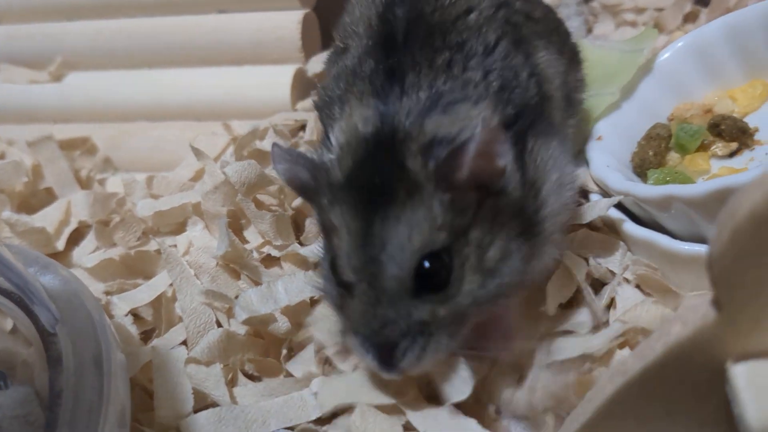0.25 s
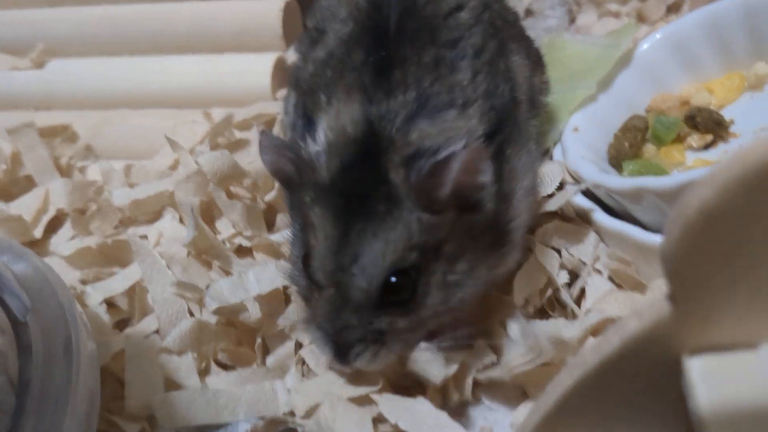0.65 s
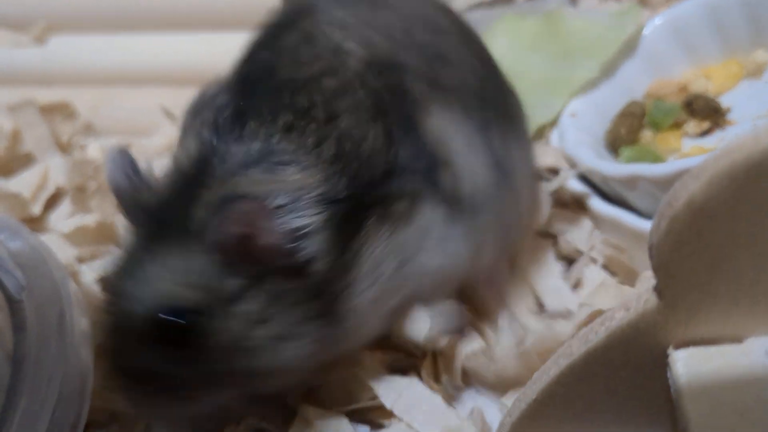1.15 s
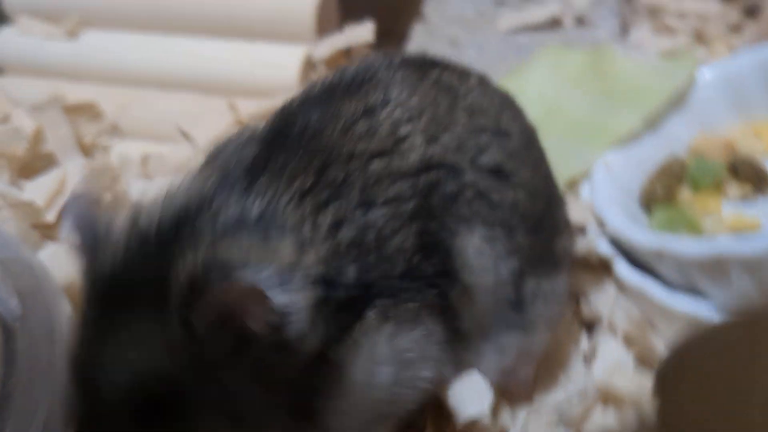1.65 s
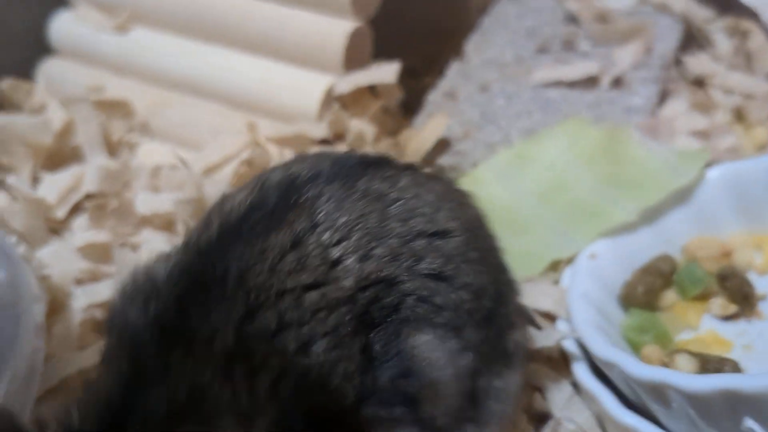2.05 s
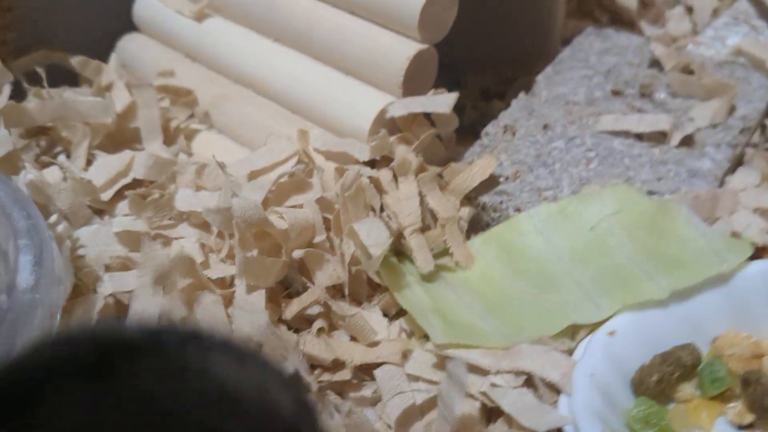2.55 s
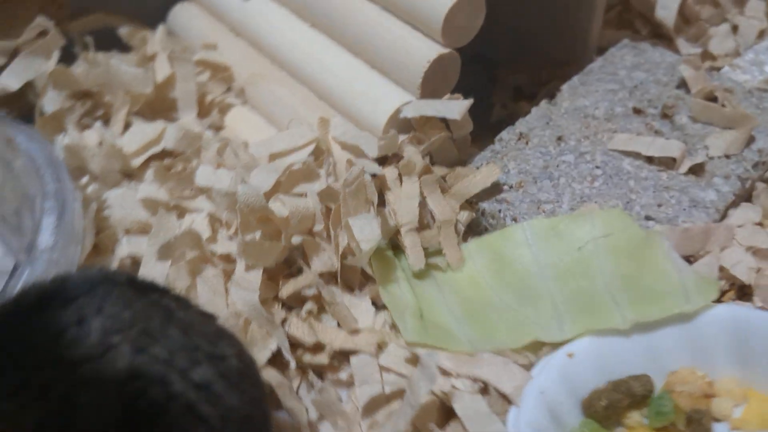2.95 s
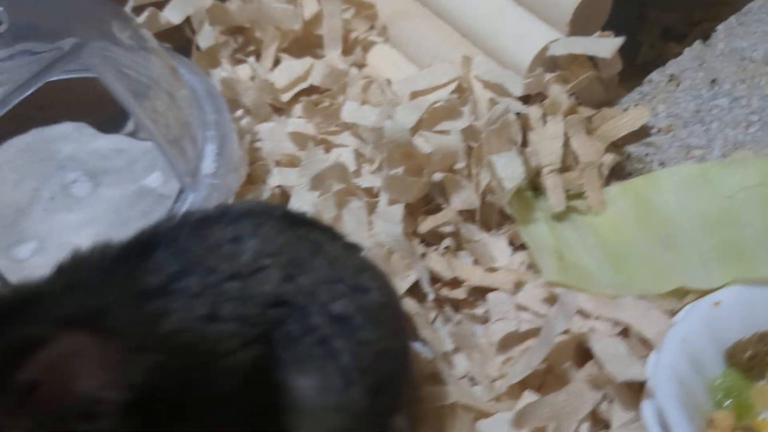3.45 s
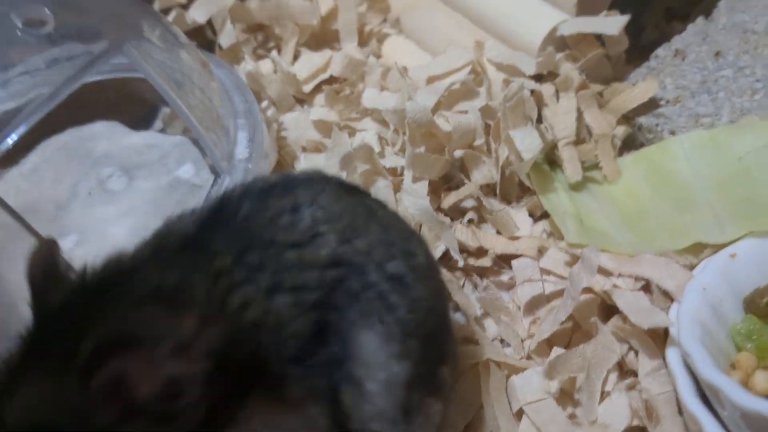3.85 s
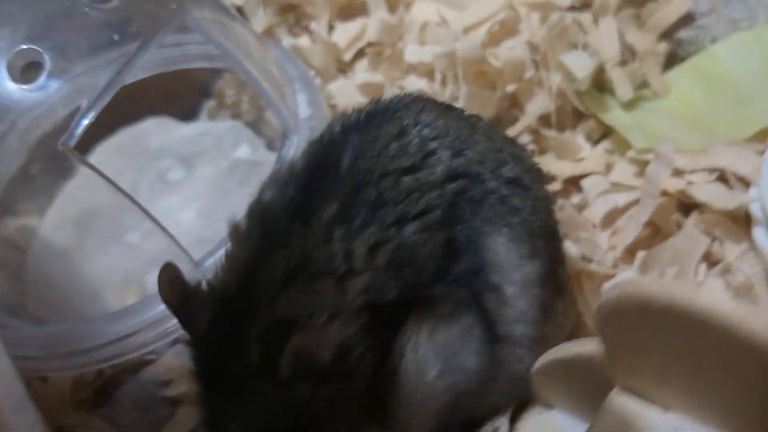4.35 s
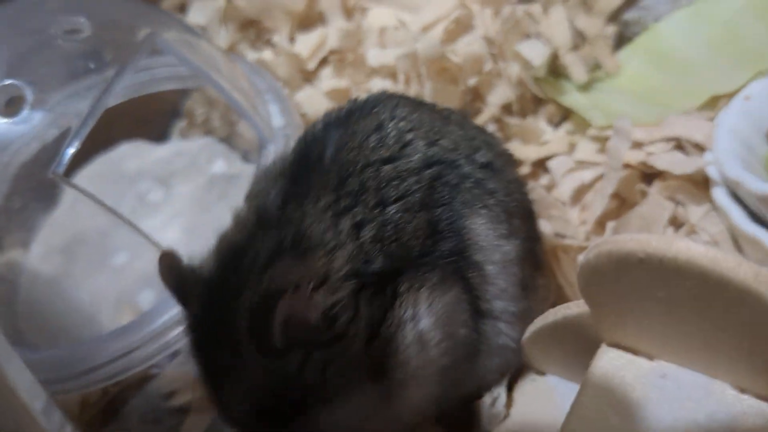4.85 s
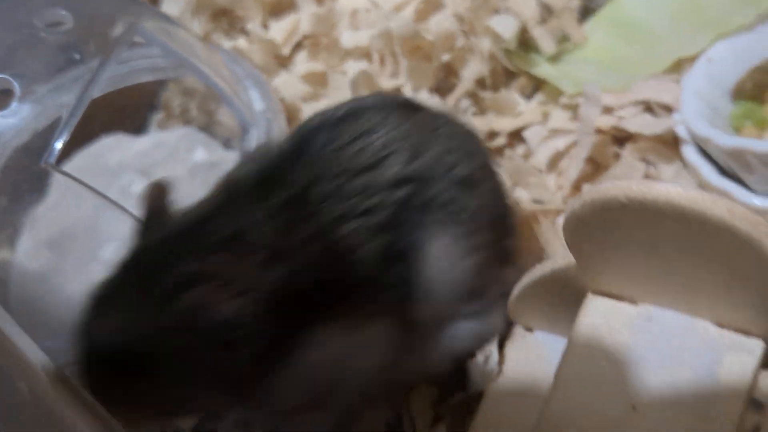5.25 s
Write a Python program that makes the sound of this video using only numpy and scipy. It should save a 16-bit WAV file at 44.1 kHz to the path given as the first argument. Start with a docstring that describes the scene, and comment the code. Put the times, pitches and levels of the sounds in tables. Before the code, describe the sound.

A hamster rustles crisply through wood shavings, then bumps and scrapes a plastic tub, while a deep unsteady hum sinks away.

```python
"""In a cage, a dwarf hamster noses through dry wood shavings, close to a hand-held phone.
Filtered grain noise makes the crackle, and short noise bursts the snaps and crunches of the shavings.
The animal also bumps a plastic sand bath: decaying modes clatter and knock, and friction noise scrapes.
Now and then the cage floor gives a hollow tap, from modes and a low thud.
Underneath lies a low, throbbing hum of drone, rumble and mains tones; it sinks towards the end."""
import sys
import numpy as np
from scipy import signal
from scipy.fft import rfft, irfft, next_fast_len
from scipy.io import wavfile
from scipy.ndimage import uniform_filter1d

SR = 44100
rng = np.random.default_rng(int(sys.argv[2]) if len(sys.argv) > 2 else 0)


def generate_wav(signal):
    """Clip the signal to [-1, 1] and save it as 16-bit WAV at the path in sys.argv[1]."""
    frames = np.transpose(np.atleast_2d(signal))
    scaled = np.clip(frames, -1, 1) * 32767
    pcm = np.round(scaled).astype(np.int16)
    wavfile.write(sys.argv[1], SR, pcm)


N = 243252
T = np.arange(N) / SR  # s

# In all tables level_db is relative within the layer, and pan_db is left minus right.
# gain of the whole hum, nearly steady and then sinking: time_s, gain_db
HUM_LEVEL = [(0, -0.5), (.5, 2), (1.6, 0), (2.5, -0.5), (3.4, -2.5), (4.1, -1.5), (4.6, -11), (5.1, -13),
             (5.52, -23)]
# strongest surges of the drone: crest_s, length_s, lift_db
SURGES = [(0.617, 0.078, 4), (0.765, 0.057, 6), (1.474, 0.052, 6), (1.866, 0.057, 9), (2.37, 0.21, 5.5),
          (2.667, 0.13, 8), (2.841, 0.083, 12), (3.199, 0.075, 13.5), (3.682, 0.24, 5), (5.205, 0.027, 6.5),
          (5.407, 0.037, 16)]
# mains tones in the hum: pitch_hz, level_db
MAINS_TONES = [(200, -70), (300, -74)]
# outline of the rumble: freq_hz, density_db (per Hz)
RUMBLE_COLOUR = [(20, -34.5), (35, -8.5), (50, 0.5), (70, -6.5), (88, 0.5), (105, -4), (125, 5.5),
                 (160, -10), (230, -14), (320, -23.5), (420, -29), (700, -34.5), (1300, -47.5),
                 (3000, -65.5)]

# three tables of blows: on the bath's loose lid; paws knocking on its wall;
# the cage floor flexing under a step, mostly before the clatter. Columns:
# start_s, level_db, thud_db (beside the ring), brightness_db (per octave), contact_s (onset softness), pan_db
LID_CLATTER = [(4.042, -38.5, -17, 4.5, 0.0014, -5), (4.047, -31.5, 6.5, -4.5, 0.0026, -11.5),
               (4.061, -38, -12, 0, 0.013, -11), (4.0755, -30.5, -3, 3.5, 0.019, -3),
               (4.087, -42, -13, 0, 0.018, -24), (4.108, -33, -6, -1.5, 0.0044, -4.5)]
WALL_KNOCKS = [(4.244, -39, -10, 2.5, 0.0018, -8.5), (4.248, -30, -29, -5, 0.002, -2.5),
               (4.271, -45.5, 10.5, -7, .004, -5), (4.29, -52, 16, -17, 0.014, -1),
               (4.301, -46, 7, -4, 0.011, -8), (4.3205, -45, 4, -1, 0.0019, -4),
               (4.368, -57.5, -14, -23, 0.024, -9), (4.419, -44, -19, 1.5, 0.027, -6),
               (4.436, -33.5, -19, -1.5, 0.0045, 0.5), (4.441, -35, -36, 2, 0.0071, -12),
               (4.5845, -52.5, -28, -2, .003, -2.5), (4.681, -34.5, -15, -1.5, 0.011, -5),
               (4.686, -32.5, -15, -0.5, 0.012, -8), (4.692, -31, -23, 1, 0.013, -4)]
FLOOR_TAPS = [(1.934, -50, 14, 3, 0.012, -22), (2.490, -43.5, 9.5, 3.5, 0.014, -18),
              (2.67, -60, -15, -3, 0.012, -20), (5.091, -36.5, -4, 6.5, 0.033, -17)]
# modes that each part rings with: pitch_hz, level_db, t60_s
LID_MODES = [(224.6, -11, 0.23), (315, -2.5, 0.071), (379, 4, 0.053), (440, -9.5, 0.14), (600, -2, 0.033),
             (670, -6, 0.038), (860, -2, 0.032), (1003, -4.5, 0.067), (1174, -2.5, 0.072),
             (1430, -8, 0.034), (1470, -5, 0.082), (1653, -5, 0.089), (1815, 0.5, 0.066),
             (2200, -17, 0.023), (2620, -6, 0.077), (2970, -7, 0.055), (3373, -2.5, 0.068),
             (4500, -9, 0.042), (5010, -9.5, 0.048), (5250, -12, 0.048), (6580, -18, 0.089)]
WALL_MODES = [(339.3, -5, 0.076), (395.3, -2, 0.097), (448, 2.5, 0.046), (583, -0.5, 0.043),
              (644, -2, 0.054), (714, -3.5, 0.026), (797, -6, 0.024), (1020, -17, 0.03), (1160, -15, 0.036),
              (1643, -10.5, 0.048), (1810, -10.5, 0.054), (2535, -19.5, 0.086), (2935, -11, 0.075),
              (4000, -19.5, 0.068)]
FLOOR_MODES = [(456.3, 19, 0.082), (415, -2, .04), (680, -4, 0.021), (1550, -12.5, 0.044),
               (1760, -23, 0.046), (2350, -26, 0.082), (6020, -26, 0.025)]
# outline of the scuff at the contact: freq_hz, density_db (per Hz)
CONTACT_COLOUR = [(200, 5.5), (700, -6), (1200, -12.5), (3000, -18.5), (6000, -19.5), (11000, -29),
                  (16000, -35)]

# fur and claws scraping along the bath:
# start_s, length_s, level_db, swell_db (change over the scrape), pan_db, shell_ring_db
SCRAPES = [(3.439, .15, -77.5, 4.5, -4.5, -4.5), (3.632, 0.26, -81.5, 7.5, -4, -4),
           (4.049, 0.052, -59.5, -3, -3, 1), (4.151, 0.087, -57, 14.5, -3, -7),
           (4.26, 0.042, -76, 2, 3, -12), (4.369, 0.0095, -56, -3, -4, 0.5),
           (4.438, 0.057, -57, -10.5, -1, 0.5), (4.583, .004, -69.5, -6, 1, 1),
           (4.664, 0.012, -61, 9, 6, -20), (4.685, 0.029, -54.5, -1, 4.5, -19),
           (4.757, 0.13, -68.5, 12, 1.5, -20), (4.901, 0.042, -60.5, -13.5, -4, 9.5)]
# faint squeaks of the shell as the animal leans on it: start_s, length_s, level_db, pitch_hz
SQUEAKS = [(3.423, 0.207, -93, 3660), (3.82, 0.077, -91, 2765)]
# upper resonances of the shell under friction: pitch_hz, width_hz, level_db
SHELL_RESONANCES = [(3100, 98, 1), (3260, 110, 4), (3800, 190, 7), (4570, 130, 13), (5190, 530, 3.5),
                    (6600, 260, 0.5)]
# outline of the friction: freq_hz, density_db (per Hz)
SLIDE_COLOUR = [(300, -1), (700, -5), (1600, -9), (2650, -16), (3000, -4), (3700, -7.5), (4500, -7.5),
                (6500, -3.5), (9000, -3), (11500, 0), (13500, -9.5), (16000, -8)]

# paws and snout pushing through the shavings: start_s, length_s, level_db, swell_db (change over the push), pan_db
PUSHES = [(0.007, 0.061, -80.5, 2, 2), (0.109, 0.033, -74.5, -11, 5), (.228, 0.018, -68, 4, 3),
          (0.252, 0.031, -57.5, 2, 2), (0.304, 0.037, -60, -8, 2), (0.355, 0.032, -56, 3.5, 1.5),
          (0.437, 0.06, -71, -1, 1), (0.502, 0.053, -55.5, 3.5, 1), (.565, 0.083, -67.5, 3, 2.5),
          (0.691, .005, -65.5, -9, 3), (0.717, 0.011, -55, -9, 2.5), (0.767, 0.069, -66, 2, 0.5),
          (0.839, 0.061, -70.5, -8, 1), (0.956, .005, -68, -2, 2), (1.012, .014, -59.5, -7, -1),
          (1.044, 0.05, -68, 4, 1), (1.097, 0.065, -63, -6, 2), (1.18, 0.079, -56, 2, 3),
          (1.32, 0.21, -84, 0, 5), (1.438, 0.0073, -64.5, -1, 1), (1.755, 0.0033, -75, -11, -2),
          (1.944, 0.078, -75, 5, 1), (2.026, 0.068, -53.5, 5.5, 0.5), (2.146, 0.072, -63.5, -1.5, -1),
          (2.24, 0.028, -70.5, 8, 2), (2.28, 0.047, -59, 0, -1), (2.336, 0.079, -61, 3, 1),
          (2.434, 0.023, -66.5, -2, 1), (2.516, 0.028, -52.5, 4, 1.5), (2.563, 0.011, -46.5, 0, -1),
          (2.581, 0.1, -53, 5.5, -1), (2.716, 0.12, -73, -9, 0), (3.056, 0.058, -73.5, -6.5, 0),
          (3.158, 0.034, -76, -3, -6), (3.26, 0.081, -81, 0, 3), (4.95, .13, -70, -1.5, 0.5),
          (5.094, 0.045, -63.5, -9.5, -1.5), (5.286, .125, -80, 5.5, 3.5), (5.486, 0.0038, -64, -6, 4)]
# single shavings snapping: start_s, level_db, pan_db
SNAPS = [(0.254, -42, 13), (0.2715, -39.5, -1), (0.2764, -41.5, 7), (0.3053, -42, 12), (0.3595, -43, 13),
         (0.3811, -34, -1), (0.392, -38.5, 11.5), (0.5146, -29, 3), (0.5377, -29, 6), (0.5458, -36.5, -1),
         (0.564, -43, -2), (0.6863, -43, 12), (0.713, -39.5, 9), (0.726, -36, 4), (0.8276, -50, -4),
         (0.9602, -49.5, 3), (1.0103, -39, 11), (1.2207, -45, 7), (1.2357, -47, 9), (1.452, -51, 8),
         (1.483, -46.5, 9), (1.747, -52.5, 7), (2.0244, -43, -8), (2.062, -39, 5), (2.29, -40, -4),
         (2.308, -45, 4), (2.32, -44, 3), (2.5228, -36.5, 0), (2.5356, -32.5, -3), (2.567, -30, -2),
         (2.584, -40, -4), (2.67, -30.5, 0), (2.7401, -57, 6.5), (3.296, -57, 3), (3.3313, -53.5, 6),
         (3.6718, -58.5, 4), (4.4433, -35.5, -10), (4.904, -54, -3), (5.129, -50, 5), (5.48, -45, 12)]
# thick flakes crushed under a paw: start_s, level_db, pitch_hz
CRUNCHES = [(.115, -75, 1680), (0.297, -58, 1010), (.38, -74, 1120), (0.444, -67.5, 2060),
            (.458, -65, 1240), (.635, -74, 2020), (0.726, -69, 1380), (0.788, -63, 1610),
            (0.826, -60.5, 1840), (1.011, -68, 1830), (1.103, -56.5, 1900), (1.214, -59.5, 1510),
            (1.253, -66, 1130), (2.09, -61, 2160), (2.338, -65, 2250)]
# outlines of the crackle and of one snap: freq_hz, density_db (per Hz)
SHAVINGS_COLOUR = [(410, -38), (700, -29), (1060, -3.5), (1300, -9.5), (2190, -5), (2990, -8), (3940, -3),
                   (5690, -4), (6230, 0.5), (8100, -4.5), (11500, 2.5), (15200, -7.5), (16000, -5)]
SNAP_COLOUR = [(300, -26), (800, -11), (2000, -14), (3500, -18), (5500, 1), (8000, 1.5), (11000, 5),
               (13500, -5.5), (16000, -12)]

DRONE_HZ, DRONE_DB, RUMBLE_DB = 65.1, -52.5, -56.5  # levels before the hum's own gain
THROB_DEPTH, THROB_PER_S, WAVER_HZ = 0.53, 22, 5
MAINS_DB, MAINS_SINK = 3, 1.01  # gain of the mains tones; dB they move per dB of the hum
HISS_DB, HISS_SINK = -84, 0.15  # level at a hum gain of 0 dB; dB the hiss moves per dB of the hum
# times to rise before a movement, and to settle after it, by 60 dB
PUSH_ATTACK_S, PUSH_RELEASE_S = 0.0546, 0.1001
SCRAPE_ATTACK_S, SCRAPE_RELEASE_S = 0.03731, 0.1001
SQUEAK_WIDTH_HZ = 49
CATCH_DB, CATCHES_PER_S = 1.35, 110
TOP_HZ = 15900


def undb(db):
    """Turn decibels into gain."""
    return 10 ** (np.asarray(db) / 20)


def unit(x):
    """Scale to rms 1."""
    return x / np.sqrt(np.mean(x ** 2))


def curve(rows):
    """Join (time, value) rows by straight lines."""
    return np.interp(T, *np.transpose(rows))


def walk(rate):
    """Drift in straight slides between random levels, rate of them a second; spread near 1."""
    k = int(SR / rate)
    levels = np.repeat(rng.standard_normal(N // k + 1), k)
    return 1.2 * uniform_filter1d(levels, k)[:N]


def fade(t, t60):
    """Decay exponentially, 60 dB down after t60."""
    return np.exp(-np.log(1000) * t / t60)


def pan(db):
    """Left and right gains for a level difference."""
    return undb(np.array([[0.5], [-0.5]]) * db)


def add(out, s, sound):
    """Mix a stereo sound in at a time."""
    i = int(s * SR)
    out[:, i:i + sound.shape[1]] += sound[:, :N - i]


def band(x, hz, width):
    """Resonate with gain 1 at the centre."""
    return signal.lfilter(*signal.iirpeak(hz, hz / width, fs=SR), x)


def colour(x, points):
    """Filter to a (Hz, dB) outline in minimum phase, so that nothing sounds before its onset."""
    n = 2 * next_fast_len(x.shape[-1])
    hz, db = np.transpose(points)
    bins_hz = np.arange(n // 2 + 1) * SR / n
    gain = undb(np.interp(np.log(bins_hz + 1), np.log(hz), db))
    # folding the cepstrum onto positive time gives minimum phase
    cepstrum = irfft(np.log(gain))
    cepstrum[1:n // 2] *= 2
    cepstrum[n // 2 + 1:] = 0
    return irfft(rfft(x, n) * np.exp(rfft(cepstrum)))[..., :x.shape[-1]]


def cage(x, wet_db, t60):
    """Add dense decaying reflections from the cage walls, different at each microphone."""
    t = T[:SR // 5]
    echoes = rng.standard_normal((2, len(t))) * fade(t, t60) * (t > 0.001)
    echoes *= undb(wet_db) / np.sqrt(np.sum(echoes ** 2, axis=1, keepdims=True))
    return x + signal.fftconvolve(x, echoes, axes=1)[:, :N]


def grains(rate, spread_db, t60):
    """Tiny fractures of very uneven size, each a short burst; the slow level stays even."""
    sizes = undb(spread_db * np.minimum(rng.exponential(size=N), 5))
    hits = (rng.random(N) < rate / SR) * sizes
    power = signal.fftconvolve(hits ** 2, fade(T[:SR // 20], t60) ** 2)[:N]
    power = np.abs(power) + 1e-9
    slow_power = uniform_filter1d(power, size=2200)
    return np.sqrt(power / slow_power) * rng.standard_normal((2, N))


def stroke(s, length, swell_db, attack, release):
    """Gain of one movement: a quick rise, a hold that swells or eases, then settling."""
    held = np.clip((T - s) / max(length, 0.001), 0, 1)
    outside = np.maximum(s - T, 0) / attack + np.maximum(T - s - length, 0) / release
    return undb(swell_db * (held - 0.5)) * fade(np.minimum(outside, 2 / 0.91), 1)


def room():
    """A low drone that throbs and wavers over a soft rumble, with mains tones and a faint hiss."""
    hum_db = curve(HUM_LEVEL)
    surge_db = sum(db * np.exp(-(2 * (T - s) / length) ** 2) for s, length, db in SURGES)
    # the throb at times dips almost to nothing; a surge evens it out
    throb = 1 + THROB_DEPTH * walk(THROB_PER_S) * undb(-surge_db)
    phase = 2 * np.pi * np.cumsum(DRONE_HZ + WAVER_HZ * walk(22)) / SR
    # the two channels drift a little out of step
    drift = 0.14 * np.array([walk(9.2), walk(25)])
    drone = unit(np.sin(phase + drift)) * throb * undb(DRONE_DB + hum_db + surge_db)
    # the rumble is nearly alike in both channels
    rumble = rng.standard_normal(N) + undb(-7) * rng.standard_normal((2, N))
    rumble = unit(colour(rumble, RUMBLE_COLOUR)) * undb(RUMBLE_DB + hum_db)
    tones = sum(undb(db) * unit(np.sin(2 * np.pi * hz * T + rng.uniform(0, 2 * np.pi)))
                for hz, db in MAINS_TONES)
    tones = tones * undb(MAINS_DB + MAINS_SINK * hum_db)
    hiss_colour = [(300, 10.5), (1000, 2.5), (3000, -0.5), (7000, -2), (12000, -2.0), (16000, -12)]
    hiss = unit(colour(rng.standard_normal((2, N)), hiss_colour))
    return drone + rumble + tones + hiss * undb(HISS_DB + HISS_SINK * hum_db)


def blows(rows, modes, scatter, contact_db, contact_t60, thud_hz, thud_t60):
    """Each blow rings the part's modes, scuffs at the contact and shakes the cage base."""
    out, t = np.zeros((2, N)), T[:SR // 3]
    hz, mode_db, t60 = np.transpose(modes)[:, :, None]
    for s, db, thud_db, bright_db, contact_s, pan_db in rows:
        # every blow lands on another spot, which shifts and reweights the modes
        shift, weight, phase, skew = rng.standard_normal((4, *hz.shape))
        turn = 2 * np.pi * (hz * (1 + scatter * shift) * t + phase)
        sizes = undb(mode_db + bright_db * np.log2(hz / 500) + 0.5 * weight) * fade(t, t60)
        # the higher modes buzz against the contact and reach the two microphones out of step
        height = np.minimum(hz / 1500, 1) ** 2
        buzz = unit(uniform_filter1d(rng.standard_normal(turn.shape), size=260))
        ring = np.array([np.sum(sizes * np.sin(turn + height * (0.55 * buzz + side * skew)), axis=0)
                         for side in (1, -1)])
        # the scuff is wider in stereo towards the treble
        common, apart = rng.standard_normal((2, len(t))) * fade(t, contact_t60)
        apart = colour(apart, [(200, -15.5), (1500, 7.0)])
        scuff = colour(np.array([common + apart, common - apart]), CONTACT_COLOUR)
        scuff *= undb(contact_db + 2 * bright_db) / np.abs(scuff).max()
        body = (ring / np.abs(ring).max() + scuff) * (1 - fade(t, contact_s))
        thud = np.sin(2 * np.pi * thud_hz * t) * fade(t, thud_t60) * (1 - fade(t, 0.0016))
        thud *= undb(thud_db)
        add(out, s, undb(db) * (body * pan(pan_db) + thud * pan(pan_db / 2)))
    return out


def furniture():
    """The cage floor, the bath's wall and its lid, each with its own ring, inside the cage."""
    floor = blows(FLOOR_TAPS, FLOOR_MODES, scatter=0.0033, contact_db=-29.5, contact_t60=0.12,
                  thud_hz=124, thud_t60=0.046)
    wall = blows(WALL_KNOCKS, WALL_MODES, scatter=0.011, contact_db=-8.5, contact_t60=0.068,
                 thud_hz=130, thud_t60=0.033)
    lid = blows(LID_CLATTER, LID_MODES, scatter=0.0034, contact_db=-1.5, contact_t60=0.031,
                thud_hz=90, thud_t60=0.065)
    return cage(lid + wall + floor, wet_db=-5.5, t60=0.052)


def sliding():
    """Fine friction on thin plastic, coloured by the shell's upper resonances, with faint squeaks."""
    friction = unit(colour(grains(rate=800, spread_db=3.0, t60=0.012), SLIDE_COLOUR))
    shell = sum(undb(db + 2 * walk(25)) * band(friction, hz, width) for hz, width, db in SHELL_RESONANCES)
    scrapes, squeaks = np.zeros((2, N)), np.zeros((2, N))
    for s, length, db, swell, pan_db, ring_db in SCRAPES:
        gain = stroke(s, length, swell, SCRAPE_ATTACK_S, SCRAPE_RELEASE_S) * undb(db - 6.5)
        scrapes += (friction + shell * undb(ring_db)) * gain * pan(pan_db)
    for s, length, db, hz in SQUEAKS:
        tone = unit(band(band(friction, hz, SQUEAK_WIDTH_HZ), hz, SQUEAK_WIDTH_HZ))
        squeaks += tone * stroke(s, length, 0, SCRAPE_ATTACK_S, SCRAPE_RELEASE_S) * undb(db)
    return cage(scrapes, wet_db=1.5, t60=0.032) + squeaks


def patchy(x, patchy_db, rate, tilt_db):
    """Other flakes take over from moment to moment: each half octave swells alone; tilt is per half octave."""
    size = next_fast_len(N)
    spectrum = rfft(x, size)
    hz = np.clip(np.linspace(0, SR / 2, spectrum.shape[1]), 700, 15800)
    place = 2 * np.log2(hz / 5600)  # half octaves from the pivot
    out = np.zeros((2, N))
    for k in range(-6, 4):
        part = irfft(spectrum * np.maximum(1 - np.abs(place - k), 0), size)[:, :N]
        out += part * undb(patchy_db * walk(rate) + tilt_db * k)
    return out


def crackling():
    """Many small fractures as shavings rub and crack under each push."""
    power = sum((stroke(s, length, swell, PUSH_ATTACK_S, PUSH_RELEASE_S) * undb(db) * pan(pan_db)) ** 2
                for s, length, db, swell, pan_db in PUSHES)
    effort = np.sqrt(power)
    effort_db = 20 * np.log10(effort.mean(axis=0) + 1e-5)
    crackle = unit(colour(grains(rate=600, spread_db=2.5, t60=0.0032), SHAVINGS_COLOUR))
    # gentle brushing is duller than hard digging
    crackle = patchy(crackle, patchy_db=1.24, rate=35, tilt_db=0.015 * (effort_db + 28))
    # the flakes catch and give, so a push is never even
    return crackle * effort * undb(-5.5 + CATCH_DB * walk(CATCHES_PER_S))


def cracking():
    """Larger shavings snap in a brief noise burst; thick ones crunch at their own pitch."""
    cracks, t = np.zeros((2, N)), T[:SR // 16]
    for s, db, pan_db in SNAPS:
        burst = colour(rng.standard_normal((2, len(t))) * fade(t, 0.0069), SNAP_COLOUR)
        add(cracks, s, burst / np.abs(burst).max() * undb(db - 3.5) * pan(pan_db))
    for s, db, hz in CRUNCHES:
        # the flake gives way gradually
        burst = rng.standard_normal((2, len(t))) * fade(t, 0.05) * (1 - fade(t, 1 / 30)) ** 2
        burst = band(band(burst, hz, 0.71 * hz), hz, 0.71 * hz)
        add(cracks, s, burst / np.abs(burst).max() * undb(db))
    return cracks


def bedding():
    """The shavings under the animal, with the cage's reflections."""
    return cage(crackling(), wet_db=0, t60=0.038) + cage(cracking(), wet_db=-4.5, t60=0.034)


def scene():
    """Everything heard at the cage, from the hum up to the shavings."""
    return room() + furniture() + sliding() + bedding()


def record(dry):
    """The phone sheds the deepest bass and cuts the top."""
    lean = signal.sosfilt(signal.butter(2, 38, "highpass", fs=SR, output="sos"), dry)
    return signal.sosfilt(signal.ellip(8, 0.2, 70, TOP_HZ, fs=SR, output="sos"), lean)


dry = scene()
out = record(dry)
generate_wav(out)
```